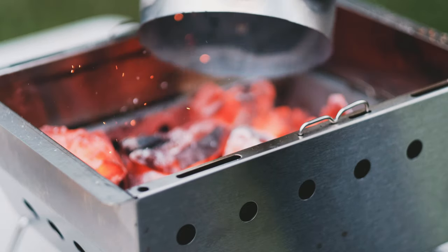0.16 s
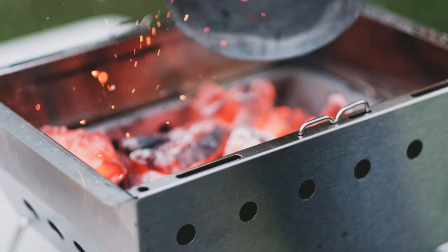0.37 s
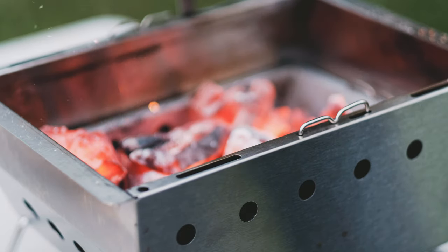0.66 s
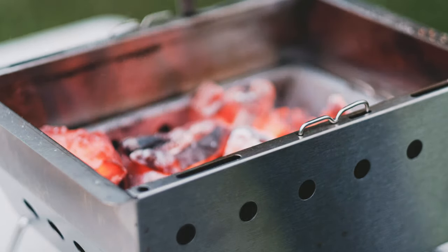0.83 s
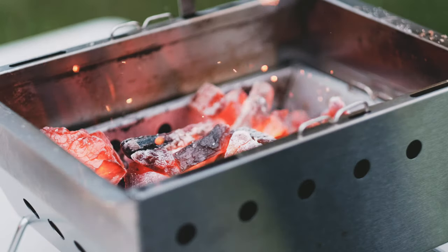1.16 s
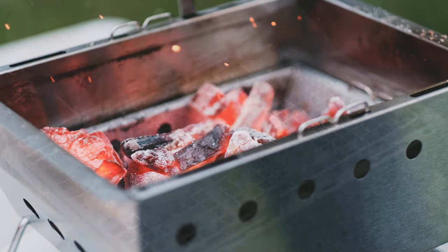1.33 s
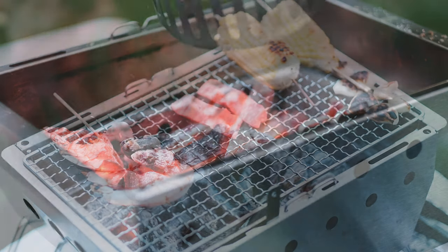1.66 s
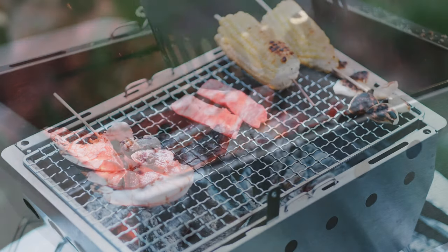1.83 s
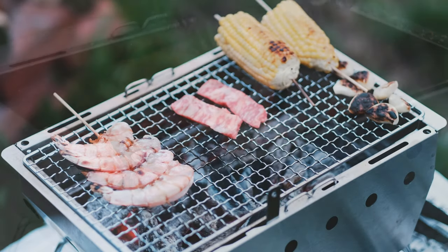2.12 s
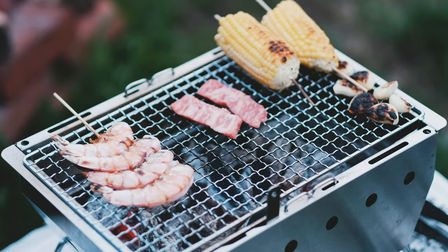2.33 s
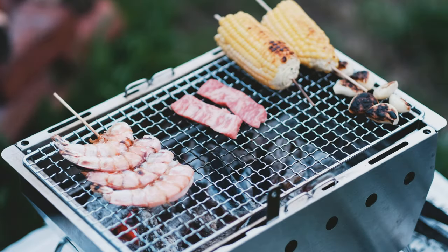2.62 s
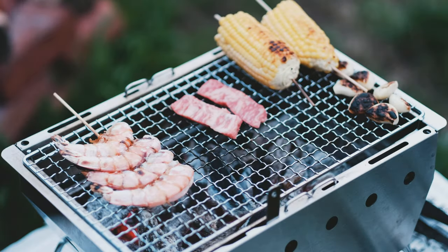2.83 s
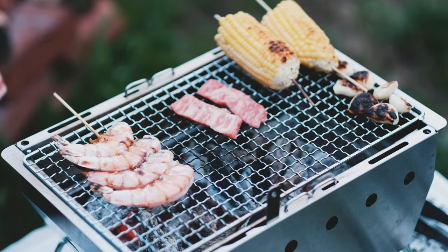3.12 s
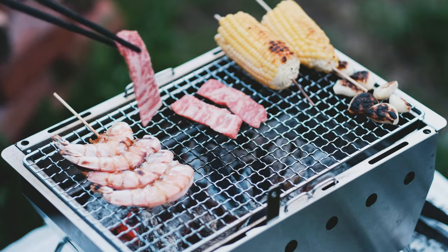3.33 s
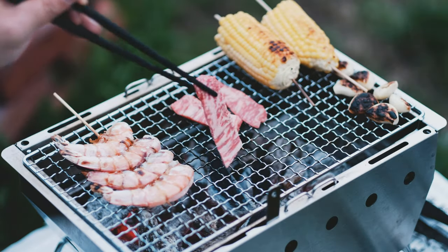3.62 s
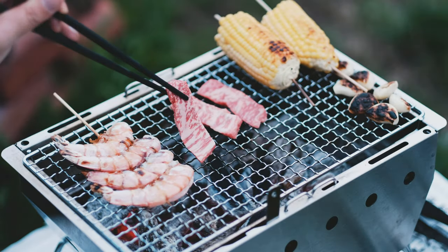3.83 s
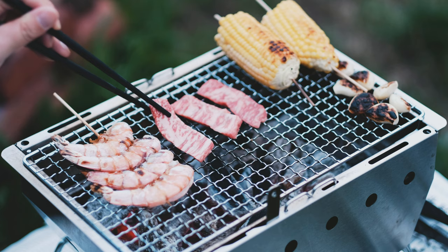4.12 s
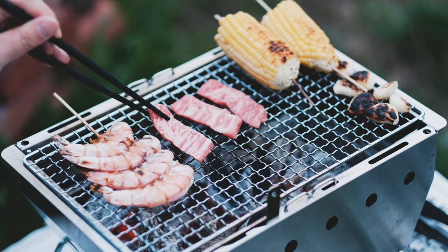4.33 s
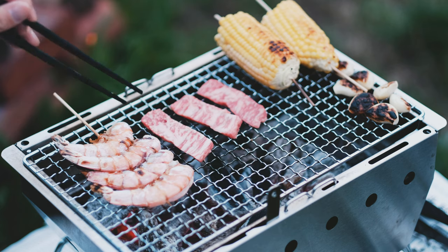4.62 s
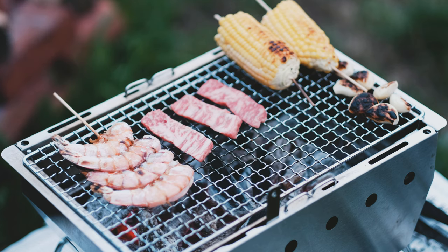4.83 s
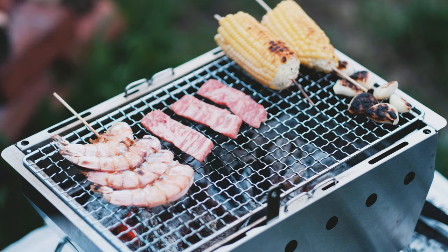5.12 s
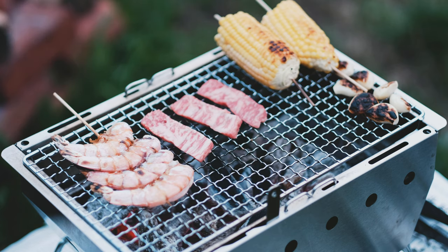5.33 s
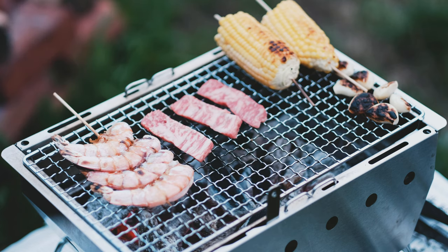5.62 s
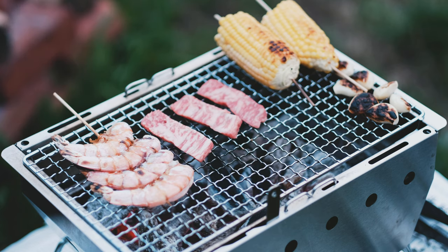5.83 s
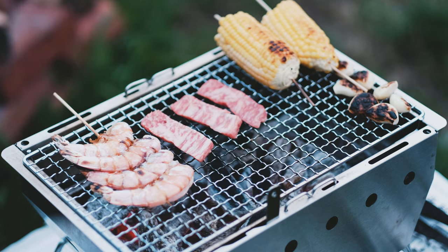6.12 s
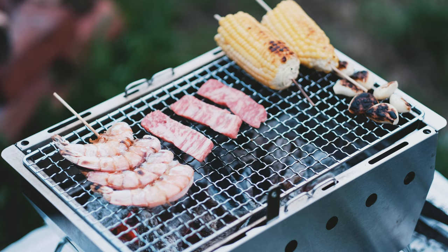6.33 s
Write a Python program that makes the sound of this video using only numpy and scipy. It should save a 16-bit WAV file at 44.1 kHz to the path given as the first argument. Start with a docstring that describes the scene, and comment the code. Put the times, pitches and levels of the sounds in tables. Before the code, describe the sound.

Hot charcoal clatters from a metal can into a small grill, then sharp coal pops snap over sizzling food while sparrows chirp outdoors.

```python
"""Glowing charcoal slides from a sheet-metal can into a small steel grill, clattering, knocking and popping;
then food sizzles over coals that go on popping. Songbirds call from trees nearby, blurred by echoes;
the fire rumbles softly under a single microphone. Bursts of noise drive decaying modes for coals and can,
pitch tracks drive near-sine birds, and shaped noise makes spray, sizzle, fire and open air."""
import sys
import numpy as np
from scipy import signal
from scipy.fft import rfft, irfft, next_fast_len
from scipy.io import wavfile
from scipy.ndimage import uniform_filter1d

SR = 44100
rng = np.random.default_rng(int(sys.argv[2]) if len(sys.argv) > 2 else 0)


def nominal_scale(level):
    """Amplitude ratio for a level in decibels (scalar or array-like)."""
    x = np.asarray(level, float) / 20
    return 10 ** x


def materialize(psi):
    """Save the field psi as 16-bit PCM at rate SR to the path in sys.argv[1].

    A 1-D psi becomes a single channel; in a 2-D psi each row is a channel.
    """
    bounded = np.clip(np.atleast_2d(psi).T, -1, 1)
    quanta = np.round(bounded * 32767).astype(np.int16)
    wavfile.write(sys.argv[1], SR, quanta)


N = 284886
T = np.arange(N) / SR
# background behind the grill: t/s, fire rumble level/dB, open air level/dB
BACKGROUND = [(0.0, -66, -51), (0.4, -65, -55.5), (1.11, -57, -53), (1.26, -59, -53), (1.48, -65.5, -56.5),
              (1.98, -57, -59), (4.19, -53.5, -58.5), (4.88, -52, -56), (5.78, -51.5, -58),
              (6.13, -56, -58.5), (6.46, -51, -58.5)]


def unit(x):
    """Scale to rms 1."""
    return x / np.sqrt(np.mean(x ** 2))


def peak(x, db):
    """Scale the highest swing to db."""
    return x * nominal_scale(db) / np.abs(x).max()


def ring(x, hz, t60):
    """One decaying mode driven by x; t60 in seconds."""
    pole = np.exp(2j * np.pi * hz / SR - np.log(1000) / (t60 * SR))
    return signal.lfilter([1], [1, -pole], x).imag


def colour(x, points):
    """Shape x by a spectrum of (f/Hz, level/dB) points; rms 1."""
    hz, db = np.transpose(points)
    size = next_fast_len(len(x))
    f = np.maximum(np.arange(size // 2 + 1) * SR / size, 1)
    gain = nominal_scale(np.interp(np.log(f), np.log(hz), db))
    return unit(irfft(rfft(x, size) * gain, size)[:len(x)])


def walk(rate):
    """Random levels held 1 / rate s and slewed twice; spread 1."""
    hold = int(SR / rate)
    steps = np.repeat(rng.standard_normal(N // hold + 1), hold)
    return unit(uniform_filter1d(uniform_filter1d(steps, hold), hold)[:N])


def add(out, s, x):
    """Mix x in at time s."""
    i = max(int(s * SR), 0)
    out[i:i + len(x)] += x[:N - i]


def echoes(x, first_s, t60, db, patchy_db=0):
    """Scattered reflections from first_s on; patchy ones stand out as single slaps."""
    t = T[:SR // 2]
    fade_db = patchy_db * walk(131)[:len(t)] - 60 * t / t60
    tail = rng.standard_normal(len(t)) * nominal_scale(fade_db) * (t > first_s)
    return nominal_scale(db) * signal.fftconvolve(x, tail / np.sqrt(np.sum(tail ** 2)))[:N]


def highpass(x, hz):
    """Small sources radiate little bass."""
    return signal.sosfilt(signal.butter(2, hz, "high", fs=SR, output="sos"), x)


def tone(hz, gain):
    """A sine on a pitch track; gain is its rms."""
    return np.sqrt(2) * gain * np.sin(2 * np.pi * np.cumsum(hz) / SR)


def pops():
    """A coal bursts: a suction dip, a millisecond of splinters, a few short rings, slaps from nearby surfaces."""
    # single bursts, loud and faint:
    # t/s, body peak level/dB, body f/Hz, level/dB near 8 kHz, level/dB above 11 kHz
    bursts = [(0.051, -31, 2960, -37, -34), (0.069, -30, 3170, -39, -33), (0.215, -22, 4700, -32, -25),
              (0.241, -31, 1370, -40.5, -39), (0.35, -20, 5050, -51, -26), (0.39, -23, 1710, -29.5, -41),
              (0.368, -23.5, 4220, -50, -30), (0.631, -27, 5630, -46, -37), (0.701, -35, 4170, -43, -47),
              (0.906, -26.5, 4840, -15.5, -50), (1.041, -24, 3670, -50, -31),
              (1.143, -29, 1050, -43.5, -52), (1.284, -41, 5660, -50, -60),
              (1.676, -25.5, 2250, -36.5, -56), (1.853, -18, 3560, -70, -59),
              (2.329, -7.5, 3750, -27.5, -43), (2.388, -16.5, 2740, -35.5, -51),
              (2.555, -34, 1600, -47, -69), (2.744, -5, 2280, -22, -6.5), (2.845, -12.5, 2160, -44, -63),
              (2.975, -3.5, 3750, -19, -3.5), (3.107, -17.5, 1730, -56, -34),
              (3.156, -25.5, 5070, -39.5, -44), (3.187, -34, 4040, -48, -59), (3.242, -31, 3240, -54, -60),
              (3.471, 0, 2215, -14, -45), (3.925, -13.5, 2670, -31, -17), (3.932, -9.5, 4540, -36, -53.5),
              (4.236, -6, 3150, -18.5, -7), (4.598, -5, 3706, -19, -21), (4.757, -12.5, 4100, -35, -20),
              (4.803, -21, 4530, -38, -54), (4.885, -14, 4470, -70, -36), (5.014, -18, 3700, -28.5, -25.5),
              (5.214, -19, 4550, -60, -54), (5.481, -16, 3460, -40, -25.5), (5.601, 1.5, 2400, -13.5, -35),
              (5.819, -35, 1990, -68, -35.5), (5.904, -37, 2500, -55, -50), (6.349, -32.5, 3310, -47, -43)]
    crest_db = 11  # the treble peaks this far above its listed level
    crack_ms, crumbs_s, sharp_s = 0.7, .003, .0039  # fade times of the splinters
    low, top, t = np.zeros(N), np.zeros(N), T[:1500]
    rows = bursts + faint_pops(count=34)
    for s, db, hz, mid_db, top_db in rows:
        grit = rng.standard_normal(len(t))
        crack = .5 * grit * np.exp(-1000 * t / crack_ms)
        crack[0] = -0.44  # suction dip
        # the pieces settle more dully
        crumbs = crack + nominal_scale(-21) * grit * np.exp(-t / crumbs_s)
        # a small source radiates the change of its push
        swing = np.diff(crumbs, prepend=0)
        body = ring(swing, hz, 0.0012) * 3000 / hz
        body += 0.17 * ring(swing, 2680.0, 0.0031) + 1.56 * ring(swing, 1394.0, 0.0016)
        body += 0.14 * ring(crumbs, 850.0, 0.0022)
        # larger lumps crack more slowly
        body = uniform_filter1d(body, size=int(SR / hz / 4) + 1)
        mid = ring(ring(swing, 7750.0, 0.0015), 7920.0, 0.0002)
        add(low, s + .001, peak(body, db) + peak(mid, mid_db + crest_db))
        sharp = np.diff(crack + nominal_scale(-36) * grit * np.exp(-t / sharp_s), prepend=0)
        treble = ring(sharp, 12600.0, 0.0007) + 1.45 * ring(sharp, 19600.0, 0.0022)
        add(top, s + 0.000966, peak(treble, top_db + crest_db))
    slap = np.zeros(N)
    for delay_s, db in [(.025, -31), (.055, -36)]:
        add(slap, delay_s, nominal_scale(db) * low)
    return top + low + echoes(slap, .0002, 0.017, 0.1) + echoes(low, 0.008, 0.33, -27.0)


def faint_pops(count):
    """Small crackle at random moments, in rows like the listed bursts."""
    settling = 1.8  # above 1 crowds them towards the start, while the tipped coals settle
    g = rng.standard_normal((count, 4))
    s = rng.random(count) ** settling * N / SR
    db = -40 + 2 * g[:, 0]
    hz = 3500 * 1.4 ** np.clip(g[:, 1], -2, 1)
    mid_db = db - 12.5 + 4 * g[:, 2]
    top_db = db - 19.5 + 6 * g[:, 3]
    return list(zip(s, db, hz, mid_db, top_db))


def clatter():
    """Each slide of coal is a fading, clumpy spray of ticks that rings the thin can."""
    # coals sliding and striking the can: t/s, relative level/dB, fade/ms, relative treble level/dB
    slides = [(0.0181, -15, 29.6, -24), (0.0477, -37, 8.2, -2), (0.0769, -22.5, 41, -29),
              (0.0937, -23.5, 20, -22), (0.1595, -24.5, 6, 4), (0.2059, -33.5, 28, -10),
              (0.28, -32.5, 12, -3), (0.5809, -25.5, 19.5, 3.5), (0.667, -35, 73, -23),
              (0.7292, -28.5, 18, 8), (0.7812, -25, 26, -34), (1.0629, -28, 26, 9),
              (1.082, -14.5, 13.3, -5), (1.1926, -40, 6.8, 1), (1.3064, -46.5, 20, 11),
              (1.3724, -40, 43, -5), (1.4451, -31, 22, -34), (1.515, -45.5, 8.7, 11),
              (1.6187, -43.5, 130, 2), (1.7996, -34, 43, -33)]
    # modes of the sheet-metal can: f/Hz, level/dB ahead of a 1/f tilt, t60/s
    can = [(1137, -6, .08), (1373, 3, 0.061), (1710, 3, 0.05), (2025, 5.5, 0.079), (2286, -7.5, 0.053),
           (2900, -20, 0.11), (3170, -1.5, 0.17), (3650, 6, 0.037), (4600, -4, 0.04), (5240, -12, 0.06)]
    out, t = np.zeros(N), T[:9000]
    for s, db, ms, treble_db in slides:
        g = rng.standard_normal((3, len(t)))
        # fragments arrive in 4 ms bunches
        bunches = np.repeat(g[2, :len(t) // 180], 180)
        clumps = nominal_scale(5.0 * g[1] + 4.0 * bunches)
        envelope = (1 - np.exp(-t / 0.00038)) * np.exp(-1000 * t / ms)
        spray = np.diff(unit(g[0] * clumps) * envelope, prepend=0)
        shell = sum(nominal_scale(d) * ring(spray, f, t60) * 40 / f for f, d, t60 in can)
        scrape = 0.3 * ring(spray, 2700.0, 0.0022) + 0.17 * ring(spray, 860.0, 0.0015)
        scrape += 0.12 * nominal_scale(treble_db) * ring(spray, 6200.0, 0.00088)
        add(out, s, nominal_scale(db) * (shell + scrape))
    return out + echoes(out, 0.0079, 0.26, -17.0)


def knocks():
    """A soft push and a short rattle ring the bed of coals; modes near the knock's own pitch speak most."""
    # dull knocks of lumps landing, and a cluster of crackle near 4.9 s: t/s, peak level/dB, strongest f/Hz
    knock_rows = [(0.142, -32.5, 1130), (0.16, -31, 1130), (0.641, -34, 220), (1.069, -18.5, 660),
                  (1.08, -6, 1227), (1.119, -31, 1260), (1.161, -33.5, 590), (1.183, -20.5, 1000),
                  (1.292, -36, 990), (1.336, -28, 870), (1.389, -34.5, 740), (1.434, -28, 1080),
                  (3.612, -38.5, 272), (4.892, -31, 836), (4.929, -29.5, 1210), (5.253, -37, 740)]
    # modes of the bed of coals: f/Hz, level/dB ahead of a 1/f tilt, t60/s
    bed_modes = [(488, -29, 0.21), (557, 0.5, 0.1), (615, -6, 0.11), (1000, -21, 0.048), (1120, 0, 0.016),
                 (1424, 4.5, 0.039), (1620, -5, 0.015), (1740, -26, 0.058), (2600, -40, 0.058)]
    contact_cycles, rattle_ms = 0.26, 7.1  # deep lumps touch longer: contact in cycles of their pitch
    out, t = np.zeros(N), T[:6000]
    for s, db, hz in knock_rows:
        push = np.hanning(int(contact_cycles * SR / hz) + 3)
        blow = 0.13 * rng.standard_normal(len(t)) * np.exp(-1000 * t / rattle_ms)
        blow[0] = 1
        swing = np.diff(np.convolve(blow, push)[:len(t)], prepend=0)
        knock = 4.3 * ring(swing, hz, .015) * 7000 / hz
        for f, mode_db, t60 in bed_modes:
            octaves_off = abs(np.log2(f / hz))
            knock += nominal_scale(mode_db - 11.0 * octaves_off) * ring(swing, f, t60) * 7000 / f
        add(out, s, peak(knock, db))
    return out


def spray_and_sizzle():
    """Tiny random ticks over steady hiss: first the coals' fine treble spray, then fat spitting over steam."""
    # colour of the hiss: f/Hz, relative level/dB per Hz
    hiss_colour = [(1500, -16.5), (2600, -7.5), (4000, -2.5), (5000, -5.5), (5800, -8.5), (7000, -4),
                   (8200, 1), (8800, -4.5), (9900, -9.5), (11200, -7.5), (12200, -4.5), (13200, -8.5),
                   (14300, -5.5), (15700, -8.5)]
    # level of the hiss, at first fine treble spray of the clattering coals,
    # from about 2 s the sizzle of food: t/s, level/dB
    hiss_level = [(0, -61), (.45, -66.5), (1.0, -62), (1.5, -68.5), (2.05, -58), (2.5, -59), (3.1, -57),
                  (3.7, -56), (4.0, -54), (4.3, -42.5), (4.8, -47.5), (5.6, -51.5), (5.9, -53.5),
                  (6.46, -50)]
    ticks = (rng.random(N) < 300 / SR) * rng.standard_normal(N)  # about 300 a second
    spit = ticks * nominal_scale(5.9 * np.minimum(rng.exponential(size=N), 3.5))
    hiss = colour(rng.standard_normal(N) + .35 * unit(spit), hiss_colour)
    # a drop of fat flashes to steam: 9 dB up around 3.165 s
    puff_db = 9 * np.exp(-((T - 3.165) / .022) ** 2)
    return hiss * nominal_scale(np.interp(T, *np.transpose(hiss_level)) + puff_db + 1.2 * walk(25))


def bird_call(shape, ratio, db, hoarse):
    """A near-sine note along (t/s, f/Hz, level/dB); hoarseness shakes its pitch and level."""
    at, hz, shape_db = np.transpose(shape)
    t = T[:int(at[-1] * SR)]
    shake = (.015 * walk(70) + .055 * walk(350))[:len(t)]
    drift = 1 + hoarse * np.minimum(t / .055, 1) ** 2 * shake
    flutter_db = hoarse * 4 * walk(200)[:len(t)]
    return tone(ratio * drift * np.interp(t, at, hz), nominal_scale(db + flutter_db + np.interp(t, at, shape_db)))


def chirps():
    """Sparrow chirps: the direct sound, what feeds the echoes, and the throw from a rough wall."""
    # one chirp, up, a short hold, down: t/s after the start, f/Hz ahead of the ratio, relative level/dB
    chirp_shape = [(0, 3690, -20), (.008, 4050, 1), (.018, 4600, 3), (.03, 4550, 2), (.037, 3950, 3),
                   (.055, 3550, 1), (.08, 3250, -1), (.1, 3050, -20)]
    # each chirp: t/s, level/dB, pitch ratio, echo level/dB
    chirp_times = [(.712, -45.5, .99, -3), (.908, -42.5, 1.02, 0.5), (1.406, -48.5, 0.95, -13.5),
                   (1.759, -50, 1.046, 1.5), (2.789, -55, 0.99, 4.5), (3.551, -50, 1.056, -4),
                   (5.366, -54, 0.96, -2), (5.661, -53, 1.08, 2), (6.105, -52, 1.04, -4)]
    wall_s, wall_db = .055, -3  # delay and loss of the wall
    near, far, wall = np.zeros((3, N))
    for s, db, ratio, echo_db in chirp_times:
        call = bird_call(chirp_shape, ratio, db, hoarse=1)
        add(near, s, call)
        add(far, s, call * nominal_scale(echo_db))
        add(wall, s + wall_s, call * nominal_scale(wall_db + echo_db / 2))
    return near, far, wall


def phrases():
    """A slightly hoarse song: a held note that drops away, repeated."""
    # one phrase: t/s after the start, f/Hz, relative level/dB
    phrase_shape = [(0, 4590, -3), (.008, 5130, -1.5), (.03, 5220, 7.5), (.036, 5310, 4),
                    (.041, 4145, -0.5), (.056, 3740, 4), (.062, 3560, -13), (.08, 3350, -1),
                    (.088, 3150, -22)]
    # each phrase: t/s, level/dB
    phrase_times = [(4.879, -46), (4.98, -46), (5.114, -46.5), (5.211, -46)]
    out = np.zeros(N)
    for s, db in phrase_times:
        add(out, s, bird_call(phrase_shape, 1, db, hoarse=.3))
    return out


def whistles():
    """Short sine whistles bend along a pitch curve while they swell and fade."""
    # crest early, then fall ever faster: t/s, length/s, crest f/Hz, end f/Hz, level/dB
    drops = [(0.347, 0.0376, 5500, 4840, -44), (0.615, 0.042, 6000, 4280, -47.5),
             (0.641, 0.031, 3150, 2440, -49.5), (0.764, .035, 6540, 4770, -55),
             (1.278, 0.026, 5870, 3830, -45), (1.368, 0.021, 5620, 5140, -46), (1.4, 0.04, 6540, 5030, -50),
             (1.49, 0.018, 5860, 5200, -55), (2.053, 0.041, 6000, 5370, -56.5),
             (3.694, 0.05, 2950, 2600, -59), (4.962, 0.01, 6000, 4050, -47),
             (5.195, 0.013, 6330, 4000, -57)]
    # slide quickly onto a pitch and hold it: t/s, length/s, start f/Hz, held f/Hz, level/dB
    glides = [(2.011, 0.018, 5460, 6700, -54.5), (3.328, 0.026, 5100, 6080, -42.5),
              (3.33, 0.032, 6050, 6680, -47), (3.729, 0.11, 2600, 2910, -54),
              (3.807, 0.088, 2800, 2170, -57), (3.874, 0.1, 3760, 3650, -59.5),
              (3.978, 0.064, 3550, 3620, -60), (4.05, 0.086, 3680, 3570, -51),
              (4.162, 0.17, 3510, 3580, -51), (4.349, 0.071, 3540, 3546, -53),
              (4.862, 0.013, 4830, 5840, -48), (5.099, 0.011, 4830, 5530, -46),
              (5.136, 0.1, 2880, 2955, -51), (5.21, 0.11, 2700, 2280, -59), (5.3, 0.056, 3180, 2450, -56)]
    crest_at, slide_share = 0.16, 0.27  # shares of the length: the crest, most of a slide

    def fall(u):
        """Pitch bends as a parabola about the crest."""
        return ((u - crest_at) / (1 - crest_at)) ** 2

    def slide(u):
        """Pitch settles exponentially."""
        return 1 - np.exp(-u / slide_share)

    out = np.zeros(N)
    for bend, notes in ((fall, drops), (slide, glides)):
        for s, length, hz0, hz1, db in notes:
            u = np.linspace(0, 1, int(length * SR))
            swell = np.abs(np.sin(np.pi * u)) ** 0.4
            add(out, s, tone(hz0 + (hz1 - hz0) * bend(u), nominal_scale(db) * swell))
    return out


def trills():
    """Buzzy trills: about 213 falling pulses a second, each at its own pitch."""
    # one list a trill: t/s, centre f/Hz, level/dB ahead of the pulsing
    trill_tracks = [
        [(4.48, 4600, -64), (4.53, 4540, -46.5), (4.62, 4600, -48), (4.72, 4590, -47), (4.8, 4710, -50.5),
         (4.83, 4630, -71)],
        [(5.34, 4600, -56), (5.39, 4420, -48), (5.47, 3940, -52.5), (5.55, 3470, -55), (5.6, 3300, -70)],
    ]
    out = np.zeros(N)
    for rows in trill_tracks:
        s, hz, db = np.transpose(rows)
        beat = 2 * np.pi * 213 * T + 0.39 * walk(40)
        pitch = np.interp(T, s, hz) + 350 * np.cos(beat) + 260 * walk(250)
        out += tone(pitch, nominal_scale(np.interp(T, s, db, -99, -99)) * (1 + np.sin(beat)))
    return out


def birds():
    """Near-sine voices; trees and walls blur every note, the distant ones most."""
    chirp, far, wall = chirps()
    phrase, whistle, buzz = phrases(), whistles(), trills()
    far = far + nominal_scale(-6) * phrase + nominal_scale(-9) * whistle + .7 * buzz
    blur = echoes(wall, 0, .22, 0, patchy_db=4) + echoes(far, .007, .3, 0, patchy_db=5)
    return chirp + phrase + whistle + buzz + blur


def hum():
    """A soft low tone swells and stops."""
    # brief hum: t/s, f/Hz, level/dB
    hum_track = [(0.82, 162.4, -71), (0.982, 153, -44.5), (1.08, 148, -60)]
    s, hz, db = np.transpose(hum_track)
    return tone(np.interp(T, s, hz), nominal_scale(np.interp(T, s, db, -99, -99)))


def fire_rumble():
    """Flames flutter in the bass: low noise of wandering level."""
    # colour of the fire: f/Hz, relative level/dB per Hz
    rumble_colour = [(12, -28), (20, -2.5), (122, -1.5), (197, -4.5), (425, -23), (500, -23), (650, -19),
                     (1100, -120)]
    s, rumble_db, _ = np.transpose(BACKGROUND)
    level_db = np.interp(T, s, rumble_db) + 1.28 * walk(9)
    return colour(rng.standard_normal(N), rumble_colour) * nominal_scale(level_db)


def open_air():
    """Air hisses around the microphone: broad noise of slowly wandering level."""
    # colour of the open air: f/Hz, relative level/dB per Hz
    air_colour = [(120, -49), (200, -5.5), (1140, -2), (1250, -3.5), (3310, -14), (4200, -8), (8270, -21.5),
                  (16000, -60)]
    s, _, air_db = np.transpose(BACKGROUND)
    level_db = np.interp(T, s, air_db) + 1.8 * walk(4.8)
    return colour(rng.standard_normal(N), air_colour) * nominal_scale(level_db)


def scene():
    """One microphone feeds both channels."""
    coals = highpass(pops(), 100.0) + clatter() + highpass(knocks(), 87.0)
    background = hum() + fire_rumble() + open_air()
    return np.tile(coals + spray_and_sizzle() + birds() + background, (2, 1))


def band_limit(x):
    """A steep low-pass at the top of the band."""
    return signal.sosfilt(signal.butter(12, 16500, fs=SR, output="sos"), x)


def record(dry):
    """The top is cut above 15.8 kHz and the loudest pops overload."""
    top_cut = signal.ellip(10, .2, 60, 15800, fs=SR, output="sos")
    mix = np.clip(signal.sosfilt(top_cut, dry), -1, 1)
    return band_limit(mix)


dry = scene()
out = record(dry)
materialize(out)
```